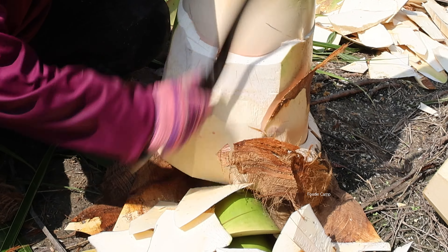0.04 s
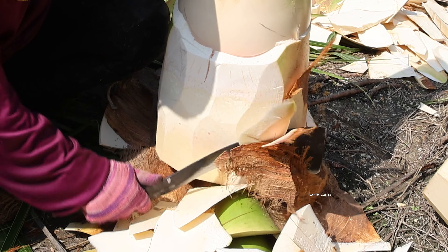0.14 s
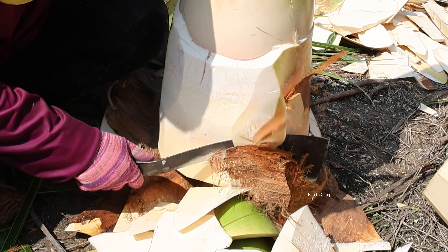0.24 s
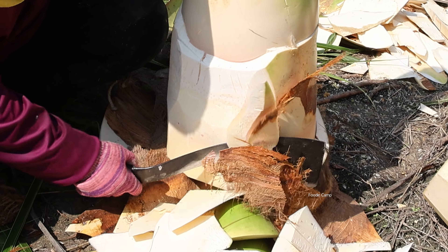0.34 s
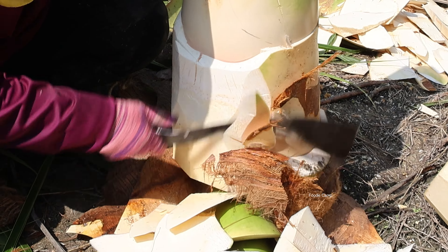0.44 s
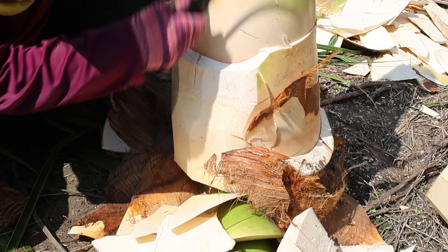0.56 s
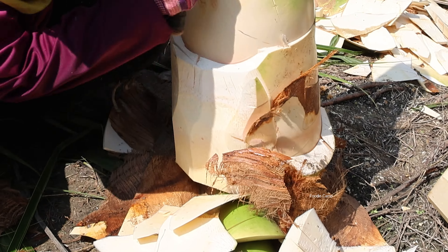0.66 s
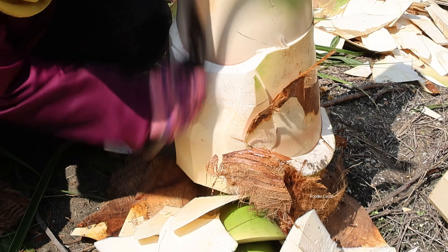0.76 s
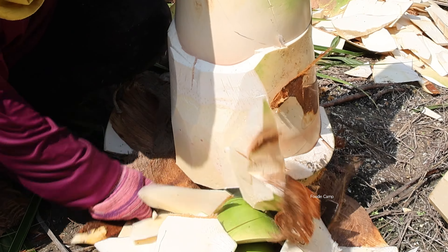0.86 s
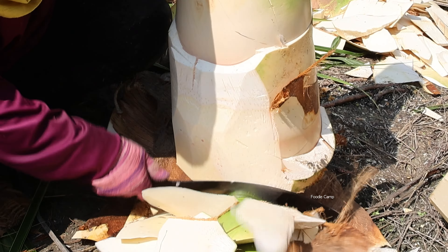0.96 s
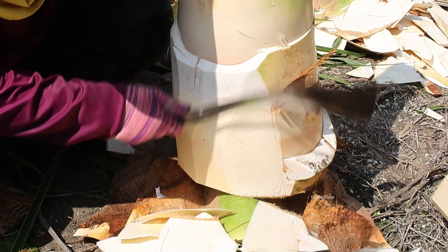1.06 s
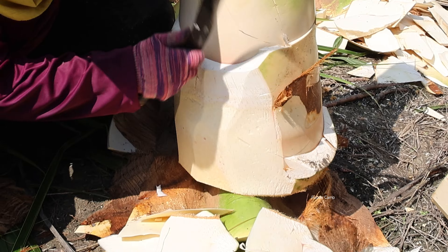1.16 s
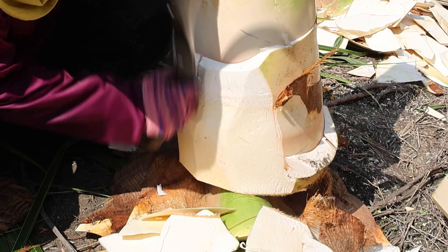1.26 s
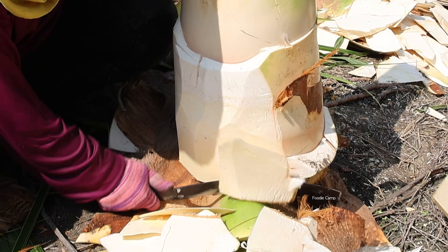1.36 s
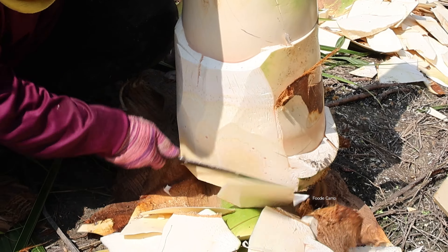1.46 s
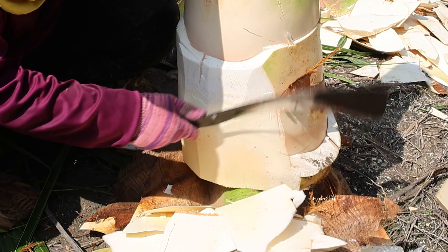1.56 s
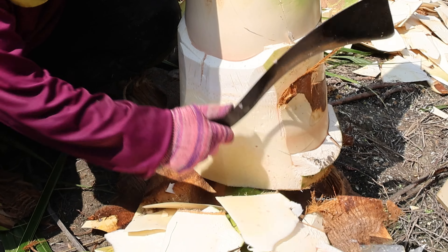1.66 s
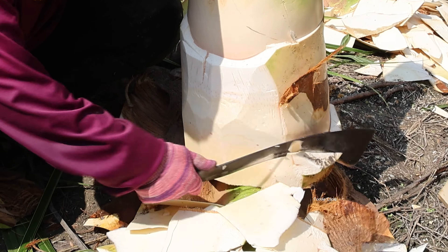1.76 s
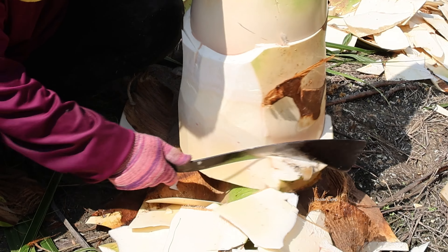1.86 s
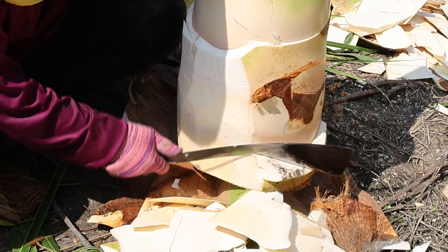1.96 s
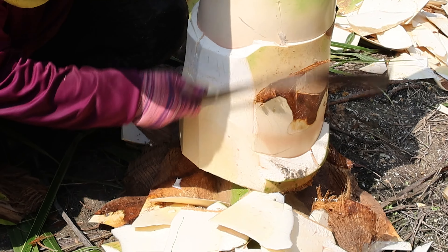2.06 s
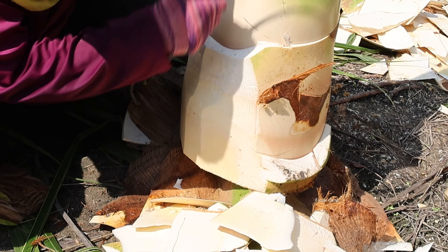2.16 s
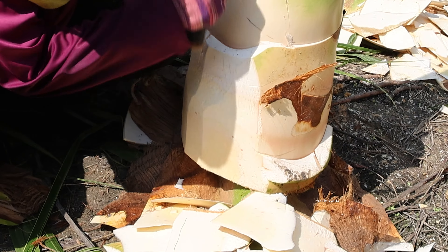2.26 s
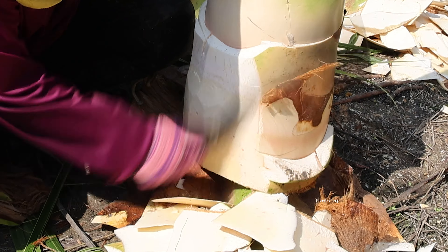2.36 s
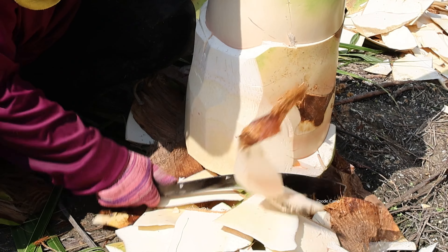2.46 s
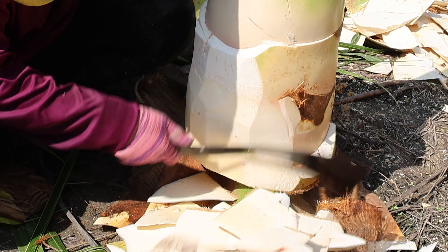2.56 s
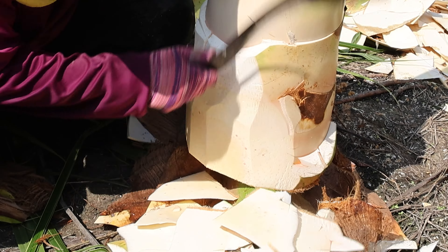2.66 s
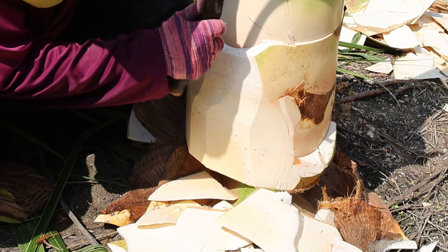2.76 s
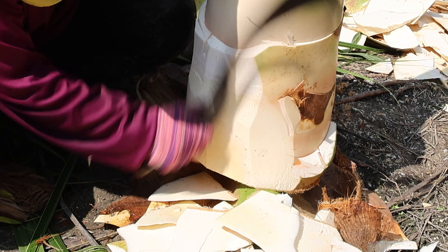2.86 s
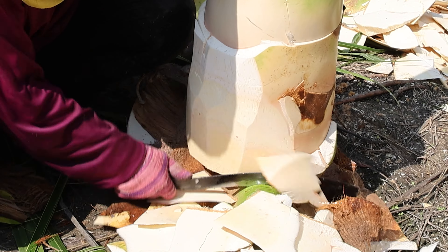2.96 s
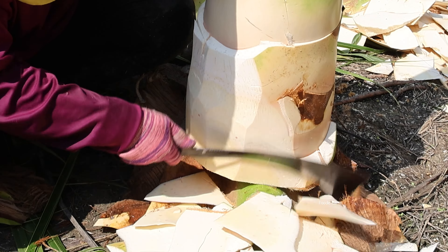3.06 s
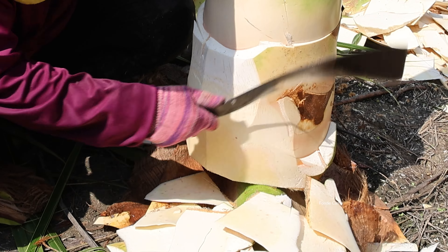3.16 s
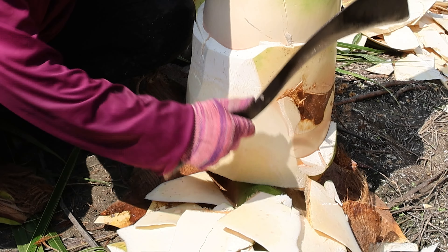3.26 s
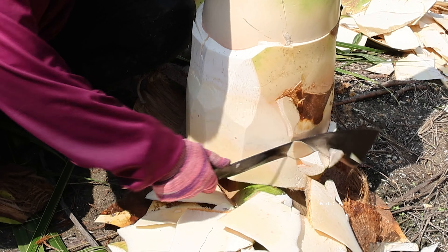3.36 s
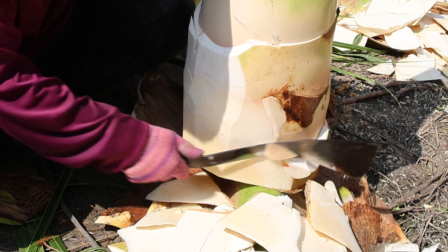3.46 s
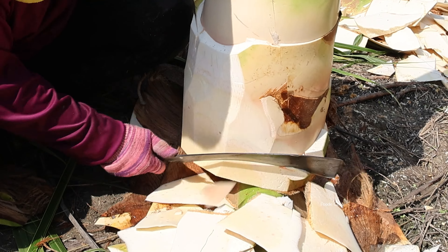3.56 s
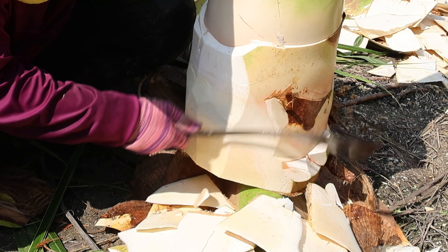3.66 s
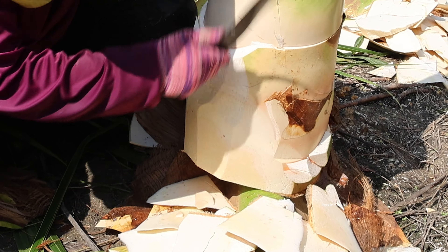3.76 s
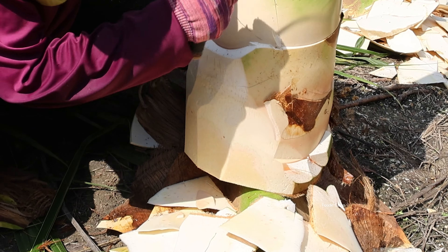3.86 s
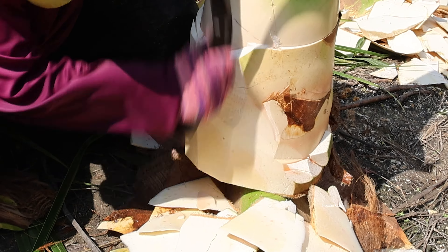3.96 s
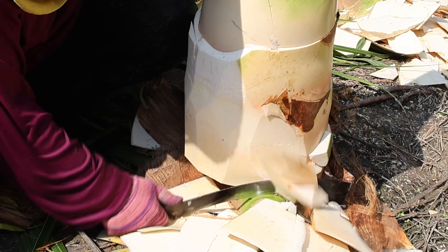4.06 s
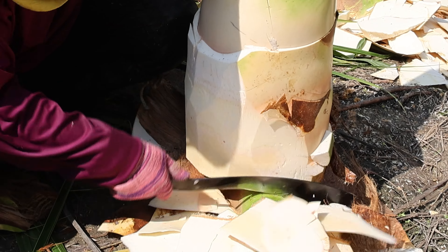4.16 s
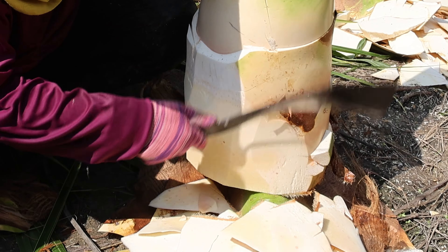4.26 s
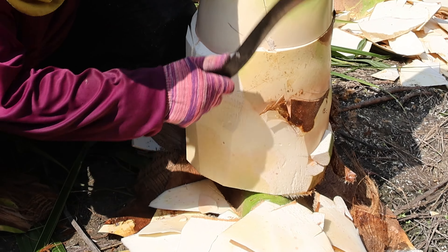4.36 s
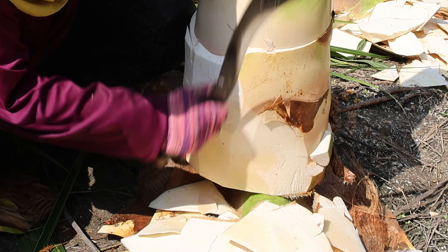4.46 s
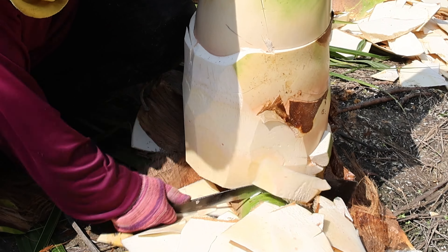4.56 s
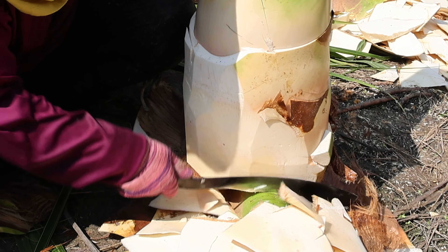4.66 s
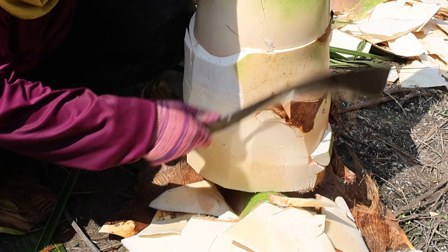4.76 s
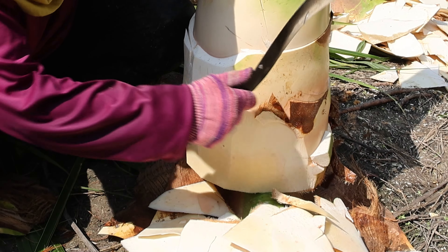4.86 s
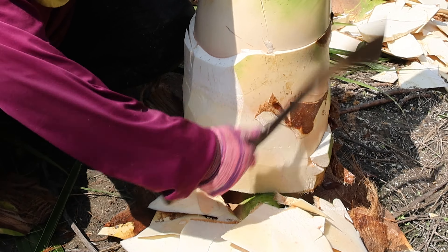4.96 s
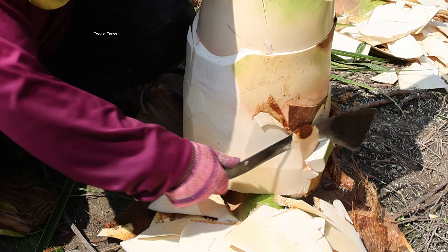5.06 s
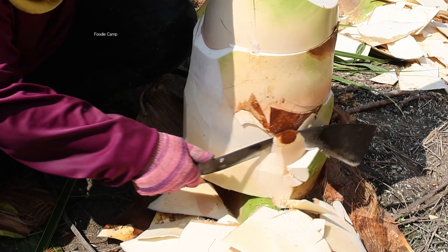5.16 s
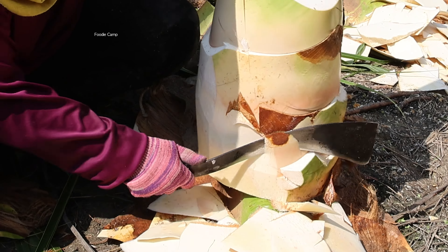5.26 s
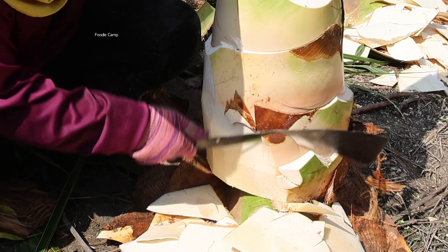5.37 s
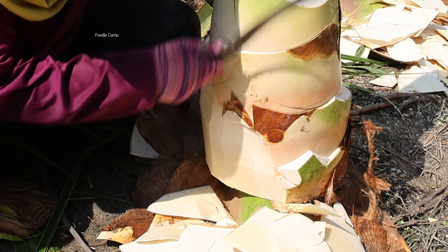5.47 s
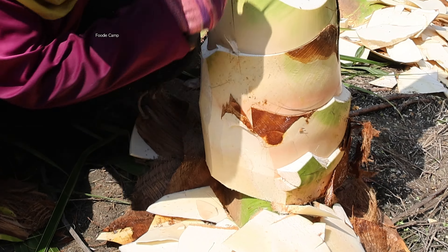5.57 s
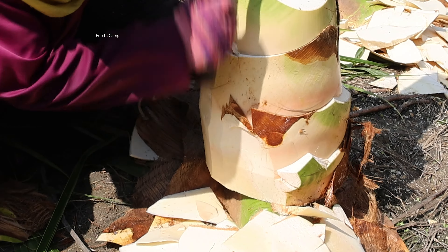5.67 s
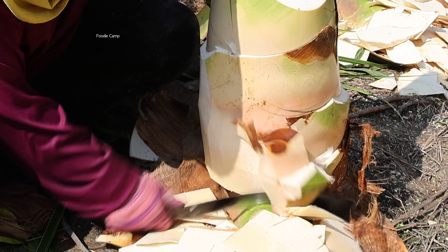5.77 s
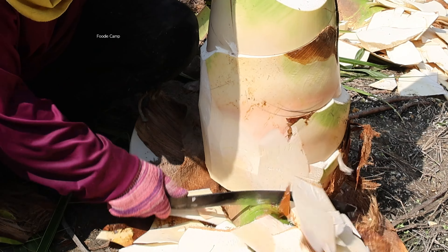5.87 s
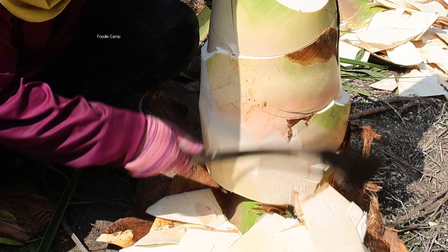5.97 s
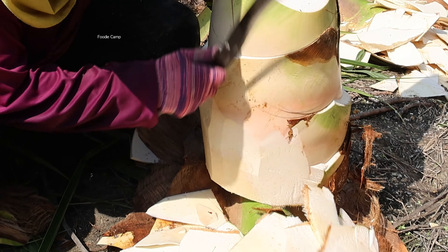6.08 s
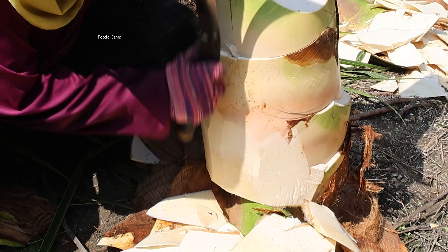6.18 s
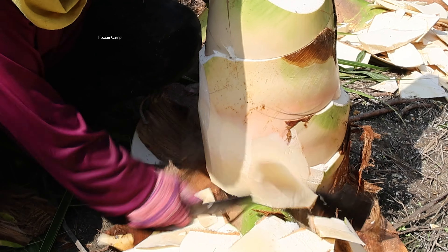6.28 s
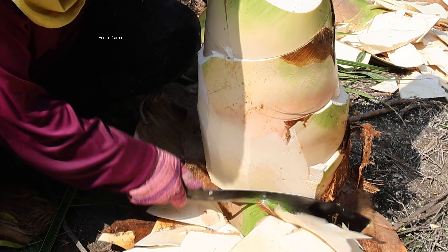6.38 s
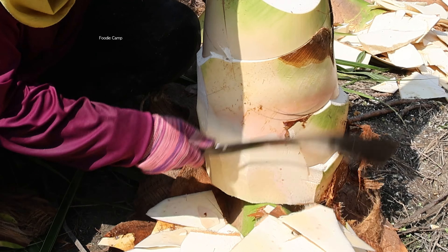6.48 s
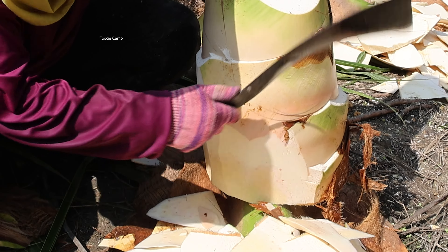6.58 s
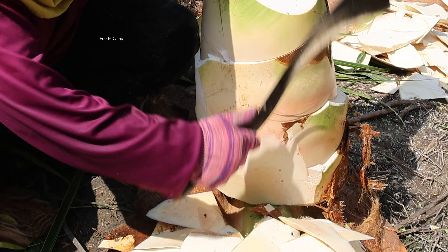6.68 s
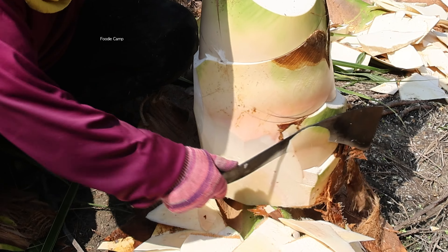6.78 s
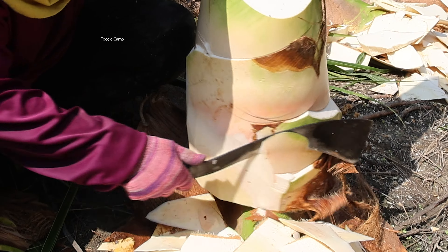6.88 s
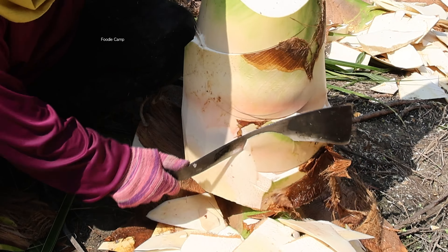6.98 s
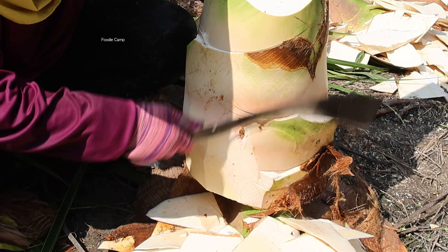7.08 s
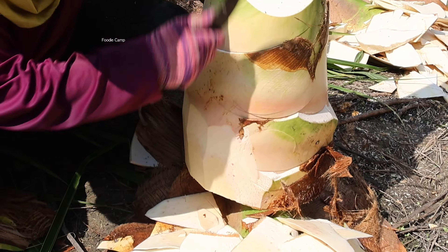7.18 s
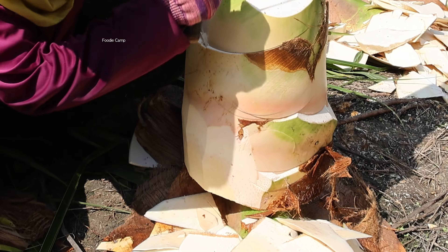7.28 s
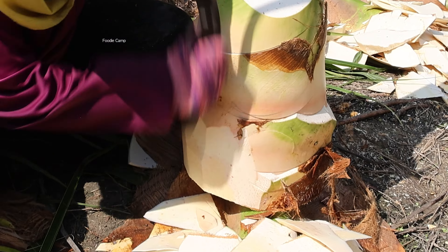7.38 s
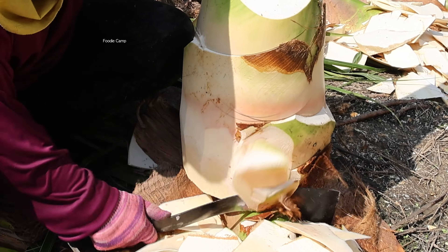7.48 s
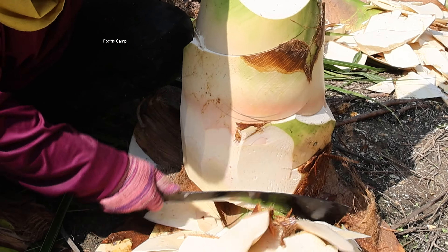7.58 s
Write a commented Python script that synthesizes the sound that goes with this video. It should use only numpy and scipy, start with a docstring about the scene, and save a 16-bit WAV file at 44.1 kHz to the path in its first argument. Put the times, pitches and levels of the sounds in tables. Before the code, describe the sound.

A machete bites into moist, fibrous stem, crunch and low woody thock together, some strokes bright and crisp, others duller. Between them come loose husk crackles, snapping fibres and small falling chips. A sharp cracking cluster with a metallic ting comes near the middle, and a hard crack ends the run. Close microphone outdoors, faint wind rumble, soft hiss and only a tiny short echo from the ground.

```python
"""A thin outdoor hiss and low wind on the microphone come first; then a blade slices a juicy palm stem up close.
Each cut is shaped noise, fibres tearing for 16 to 44 ms, and hollow knocks are decaying sines with a slap.
Snaps and chip ticks are short noise bursts, husk rustles as crackling noise, and a grazing blade rings in sines.
The ground and heaps nearby return a short, quiet echo; the recorder rounds off the loudest peaks."""
import sys
import numpy as np
from scipy import signal
from scipy.fft import rfft, irfft, next_fast_len
from scipy.io import wavfile
from scipy.ndimage import uniform_filter1d, map_coordinates

SR = 44100
rng = np.random.default_rng(int(sys.argv[2]) if len(sys.argv) > 2 else 0)


def makeup_ratio(level_db):
    """Linear amplitude ratio for a level in decibels (20 dB per factor of ten)."""
    decades = np.asarray(level_db, float) / 20
    return 10 ** decades


def transcribe(u):
    """Save the signal u as a 16-bit wav file named by the first command-line argument.

    u: samples, shape (n,) or (channels, n), limited to [-1, 1]; the rate is SR.
    q: integer samples, one column per channel.
    """
    v = np.clip(np.atleast_2d(u).T, -1, 1)
    q = np.round(v * 32767).astype(np.int16)
    wavfile.write(sys.argv[1], SR, q)


N = 336469  # length in samples

# Colour of the distant outdoor hiss: freq_hz, gain_db
AIR_COLOUR = [(32, -27), (55, -3.5), (270, -14), (767, -14), (1980, -23), (4040, -24.5), (9000, -34.5),
              (15600, -32), (16300, -57)]
# Wind at the microphone, mean level over time: time_s, level_db
WIND_LEVEL = [(0, -41), (.65, -38.5), (.95, -41), (1.3, -39), (2.2, -39), (3.8, -47), (5.2, -40.5),
              (5.8, -44.5), (6.7, -37), (7.3, -34.5), (7.63, -44)]
# Colour of the wind rumble: freq_hz, gain_db
WIND_COLOUR = [(15, -7.5), (33, -1.5), (42, -14.5), (60, -20), (90, -59)]
# Echo from ground and heaps nearby: freq_hz, t60_s
YARD_DECAY = [(300, 0.21), (2000, 0.079), (10000, 0.019)]
# Husk and chips stirred by blade and hand: start_s, swell_s, hold_s, level_db
STIR_EVENTS = [(0, 0.095, 0.05, -49.5), (0.543, 0.025, 0.313, -36), (0.983, 0.1, 0.011, -40.5),
               (1.487, 0.044, 0.044, -45.5), (1.965, 0.014, 0.0087, -38), (2.059, 0.023, 0.011, -45.5),
               (2.277, 0.07, 0.11, -36.5), (2.534, 0.05, 0.076, -42), (3.013, 0.016, 0.096, -40),
               (3.216, 0.21, .1, -47.5), (3.442, 0.017, 0.099, -36), (3.654, 0.064, 0.02, -38.5),
               (3.915, 0.15, .57, -51), (5.177, 0.042, 0.069, -47.5), (5.402, 0.056, 0.02, -38.5),
               (5.51, 0.067, 0.023, -50.5), (6.212, 0.042, 0.048, -41), (6.426, 0.04, 0.022, -40),
               (6.873, 0.13, 0.028, -45.5), (7.58, 0.02, .05, -39)]
# Colour of the dry husk crackle: freq_hz, gain_db
HUSK_COLOUR = [(700, -19), (1600, 0), (4200, 3), (11300, -0.5), (16000, -6.5)]
# Blade grazes: start_s, level_db, favoured_hz (of the spot touched), free_s (until damped)
GRAZE_EVENTS = [(0.524, -41, 2900, 0.03), (0.556, -36, 1650, .07), (0.603, -32, 2620, 0.15),
                (.796, -36, 8570, .04), (1.09, -37, 8570, 0.12), (1.58, -38, 10800, 0.07),
                (1.988, -33.5, 2900, 0.27), (2.094, -34.5, 9240, 0.092), (3.55, -17.5, 7650, 0.056),
                (4.28, -43, 2850, 0.11), (4.652, -31, 8280, 0.064), (6.256, -35, 2620, 0.066)]
# Ringing modes of the steel blade: mode_hz, level_db, t60_s
STEEL_MODES = [(1650, -24, 0.18), (2620, -40, 0.2), (2896, -23, 0.31), (4480, -18, 0.51), (5900, -14, 0.12),
               (7650, -26, 0.12), (8280, -33, 0.18), (8570, -34, 0.091), (9240, -13, 0.092),
               (10840, -5, 0.053), (12500, -19, 0.067), (14000, -15, .06), (14990, -18, .12)]
# Fibre snaps and chip ticks: start_s, level_db, centre_hz
SNAP_EVENTS = [(.206, -12, 5360), (.2133, -23, 4630), (0.236, -31, 2360), (.43, -33.5, 5800),
               (0.5534, -18, 5600), (0.5836, -17, 5900), (0.6085, -18, 4570), (0.628, -17.5, 5000),
               (0.8487, -19.5, 4200), (1.9778, -27, 3220), (1.9858, -24.5, 2900), (1.986, -24, 10400),
               (2.0941, -34, 9240), (2.3057, -27, 5050), (2.3221, -25, 4400), (2.3444, -24, 6300),
               (3.485, -12.5, 7800), (3.5103, -8.5, 7140), (3.5154, -6.5, 4570), (3.5227, -18, 4740),
               (3.5488, -14, 8200), (3.607, -15, 3450), (3.6244, -20.5, 4600), (3.707, -27.5, 7200),
               (3.735, -24, 9000), (4.2415, -31.5, 4440), (5.154, -19, 6800), (5.158, -14.5, 4130),
               (5.1818, -21, 10600), (5.3557, -30, 2110), (6.1236, -31, 3950), (6.2488, -16.5, 6500),
               (6.2764, -21, 6500), (7.5365, -1, 3550), (7.557, -1.5, 3390), (7.6254, -25, 9800)]
# Blade juddering as it is prised through husk, a snap a slip: first_s, last_s, period_s, level_db, centre_hz
JUDDER_RUNS = [(0.6613, .835, .0166, -29, 3130), (2.37, 2.466, 0.012, -25.5, 2270)]
# Hollow knocks of the stem and of falling chips: start_s, level_db, pitch_hz
KNOCK_EVENTS = [(0.168, -10.5, 358), (0.924, -1.5, 498), (1.066, -15.5, 512), (1.097, -16, 333),
                (1.441, -1.5, 488), (1.846, -11, 336), (2.502, -6.5, 495), (3.013, -4.5, 533),
                (3.117, -26, 517), (3.446, -14, 268), (4.08, -27, 546), (4.147, -9.5, 490),
                (4.22, -28, 645), (4.648, -3, 484), (4.773, -13, 517), (4.907, -28.5, 910),
                (5.083, -14.5, 601), (5.255, -22, 1080), (5.2873, -6, 514), (5.843, -9.5, 867),
                (5.869, -5, 494), (6.033, -24.5, 900), (6.347, -21, 850), (6.389, 0, 506),
                (6.449, -24, 630), (6.506, -16, 890), (6.853, -13, 268), (7.03, -26, 800), (7.05, -29, 970),
                (7.569, -15, 675)]
# Modes of the wet stem: multiple (of the knock pitch), level_db, t60_s (for a 500 Hz knock)
STEM_MODES = [(1, -1.5, 0.047), (1.45, -3, 0.026), (2.2, 4, 0.0083), (.55, -24.5, 0.1)]
# Cuts: start_s, length_s, tearing_db, rise_s (until the edge bites fully), treble_db (over body at mid-cut)
CUT_EVENTS = [(0.1644, 0.033, -6, 0.011, 4.5), (0.893, 0.037, -7, 0.01, -4), (1.407, 0.043, -8, 0.013, 0),
              (1.842, 0.017, -7, 0.016, 5), (2.4652, 0.044, -10, 0.0008, -0.5),
              (2.985, 0.038, -8, 0.017, 1), (3.445, 0.016, -6, 0.009, 3.5),
              (4.1126, 0.04, -7.5, 0.0093, -0.5), (4.6356, 0.02, -7, 0.0024, 1.5),
              (5.0821, 0.028, -11.5, 0.0095, 7.5), (5.839, 0.035, -8.5, .0015, -4),
              (6.361, 0.036, -8.5, 0.0061, 4.5), (6.831, 0.018, -13.5, 0.0025, 2),
              (7.5359, 0.041, -13.5, 0.0038, -6.5)]
# Colour of tearing fibres: freq_hz, gain_db
TEAR_COLOUR = [(88, -78), (150, -18), (566, -7.5), (1700, -7), (4000, -4), (5910, -3.5), (14000, -8),
               (16000, -16)]


def unit(x):
    """Scales a signal to rms 1."""
    return x / np.sqrt(np.mean(x ** 2) + 1e-20)


def decay(t, t60):
    """Exponential decay, falling 60 dB in t60 seconds."""
    return makeup_ratio(-60 * t / t60)


def along(points, hz):
    """Reads (freq_hz, value) points on a log frequency axis."""
    f, v = np.transpose(points)
    return np.interp(np.log(hz + 1), np.log(f + 1), v)


def wobble(rate, size=N):
    """A smooth random curve with rate knots a second."""
    knots = rng.standard_normal(size // 20 + 4)
    return map_coordinates(knots, [np.arange(size) * np.minimum(rate / SR, 1 / 20)])


def coloured(x, gain):
    """Passes x through a gain that depends on frequency, then scales it to rms 1."""
    padded = next_fast_len(len(x) + 2048)
    spectrum = rfft(x, padded) * gain(np.fft.rfftfreq(padded, 1 / SR))
    return unit(irfft(spectrum, padded)[:len(x)])


def add(track, s, sound):
    """Mixes a sound into the track at s seconds."""
    part = track[round(s * SR):][:len(sound)]
    part += sound[:len(part)]


def outdoors():
    """Far hiss that drifts slowly in level, and wind that rumbles on the microphone."""
    hiss = coloured(rng.standard_normal(N), lambda hz: makeup_ratio(along(AIR_COLOUR, hz)))
    rumble = coloured(rng.standard_normal(N), lambda hz: makeup_ratio(along(WIND_COLOUR, hz)))
    wind_db = np.interp(np.arange(N) / SR, *np.transpose(WIND_LEVEL)) + 5.7 * wobble(4.5)
    return makeup_ratio(-46 + 0.94 * wobble(3.32)) * hiss + makeup_ratio(wind_db) * rumble


def yard(x):
    """Ground and heaps nearby answer briefly, treble dying first; the tail differs every 0.3 s."""
    out, step = np.zeros(N), SR * 3 // 10
    for i in range(0, N, step):
        hz, t, z = signal.stft(rng.standard_normal(SR // 4), SR, nperseg=256)
        fading = z * decay(t, along(YARD_DECAY, hz)[:, None])
        tail = signal.istft(fading, SR, nperseg=256)[1]
        add(out, i / SR, signal.fftconvolve(x[i:i + step], tail / np.linalg.norm(tail)))
    return out


def stirring_db():
    """Level of loose husk moving: the heap at rest, the stirs, and the crumbs every cut throws off."""
    still_db, swell_db, settle_t60 = -57.5, -11, 0.35  # a stir starts swell_db down
    debris_db, debris_t60 = -32, 0.47  # crumbs, relative to their cut's tearing_db
    t = np.arange(N) / SR
    power = np.full(N, makeup_ratio(2 * still_db))
    for s, swell, hold, db in STIR_EVENTS:
        rise_db = swell_db * np.clip(1 - (t - s) / swell, 0, 1)
        settle_db = -60 * np.maximum(t - s - swell - hold, 0) / settle_t60
        power += (t > s) * makeup_ratio(2 * (db + rise_db + settle_db))
    for s, length, db, *_ in CUT_EVENTS:
        settle_db = -60 * np.maximum(t - s - length, 0) / debris_t60
        power += (t > s) * makeup_ratio(2 * (db + debris_db + settle_db))
    return 10 * np.log10(power)


def rustle(level_db):
    """Dry husk crackles in uneven bursts and patches of colour; heavier chips shuffle dully beneath."""
    uneven = makeup_ratio(1.1 * wobble(70) + 0.3 * wobble(500)) * rng.standard_normal(N)
    z = signal.stft(uneven, nperseg=256)[2]
    patches = uniform_filter1d(rng.standard_normal(z.shape), size=9, axis=0)  # across frequency
    patches = uniform_filter1d(patches, size=4, axis=1)  # across time
    patchy_db = 3 * unit(patches)
    crackle = signal.istft(z * makeup_ratio(patchy_db), nperseg=256)[1][:N]
    crackle = coloured(crackle, lambda hz: makeup_ratio(along(HUSK_COLOUR, hz)))
    shuffle = makeup_ratio(5.8 * wobble(40)) * rng.standard_normal(N)
    shuffle = coloured(shuffle, lambda hz: hz / (hz + 300) / (1 + (hz / 1500) ** 2))
    return makeup_ratio(level_db) * (crackle + makeup_ratio(-2.5) * shuffle)


def blade():
    """A graze rings all modes of the steel, fully those near the favoured pitch; a light touch wakes others less."""
    out, t = np.zeros(N), np.arange(SR // 4) / SR
    for s, db, favoured_hz, free in GRAZE_EVENTS:
        ring = np.zeros(len(t))
        for hz, level, t60 in STEEL_MODES:
            general = makeup_ratio(level + 0.079 * (db + 24) + rng.normal(0, 1.9))
            favoured = np.exp(-(np.log(hz / favoured_hz) / 0.027) ** 2)
            ring += (general + favoured) * decay(t, t60) * np.sin(2 * np.pi * hz * t)
        damping = decay(np.maximum(t - free, 0), 0.015)
        add(out, s, makeup_ratio(db) * damping * ring)
    return out


def judder_slips():
    """A juddering blade sticks and slips almost regularly, each slip a snap of uneven level and colour."""
    slips = []
    for first, last, period, db, hz in JUDDER_RUNS:
        for s in np.arange(first, last, period):
            centre_hz = hz * np.exp(rng.normal(0, 0.17))
            slips.append((s + rng.normal(0, 0.0007), db + 2 * rng.normal(), centre_hz))
    return slips


def random_ticks(loose_db):
    """Small snaps of any colour come at random, as loud as the rustle around them allows."""
    when, size, pitch = rng.random((800, 3)).T
    at = (when * (N - 1)).astype(int)
    level_db = loose_db[at] + 1 - 3 * np.log(size + 0.035)  # many small, few large
    return np.transpose([at / SR, level_db, 1200 * 8 ** pitch])


def snaps(loose_db):
    """Sharp noise bursts, broadly peaked around their centre, each a crack with a little debris after it."""
    peak_width = 0.33  # in log frequency
    out, t = np.zeros(N), np.arange(SR // 16) / SR
    crack, debris = decay(t, 0.013), makeup_ratio(-11) * decay(t, 0.062)
    shape = (crack + debris) * (1 - np.exp(-t / 0.00034))

    def colour(hz, centre_hz):
        broad = hz / (hz + centre_hz / 2) / (1 + (hz / (3 * centre_hz)) ** 2)
        return broad + np.exp(-(np.log((hz + 1) / centre_hz) / peak_width) ** 2)

    for s, db, centre_hz in [*SNAP_EVENTS, *judder_slips(), *random_ticks(loose_db)]:
        burst = coloured(rng.standard_normal(len(t)), lambda hz: colour(hz, centre_hz))
        add(out, s, makeup_ratio(db) * shape * burst)
    return out


def knocks():
    """A dull slap of contact, and the dense wet stem rings at a few low modes; small high chips die sooner."""
    out, t = np.zeros(N), np.arange(SR // 8) / SR
    onset = 1 - np.exp(-t / 0.0013)
    for s, db, hz in KNOCK_EVENTS:
        hurry = max(hz / 500, 0.85) ** 0.92  # decay speeds up with pitch
        ring = np.zeros(len(t))
        for multiple, level, t60 in STEM_MODES:
            mode = np.sin(2 * np.pi * hz * multiple * t)
            ring += makeup_ratio(level + rng.standard_normal()) * decay(t * hurry, t60) * mode
        slap = coloured(rng.standard_normal(len(t)), lambda f: (f > 150) / (1 + (f / 1600) ** 2))
        slap = makeup_ratio(-6) * decay(t, 0.034) * slap
        add(out, s, makeup_ratio(db) * onset * (ring + slap))
    return out


def slot_resonance(t, length):
    """Noise resonates in the opening slot, lower once the blade is 0.64 of the way through."""
    def peak(centre_hz):
        return coloured(rng.standard_normal(len(t)),
                        lambda hz: 1 / (1 + (np.log((hz + 1) / centre_hz) / 0.088) ** 2))

    deep = 1 / (1 + np.exp((0.64 - t / length) * 10))
    return np.sqrt(1 - deep) * peak(3990) + np.sqrt(deep) * peak(2700)


def cuts():
    """Fibres tear as the edge travels; treble and slot pitch sink, and the level drops as the slice breaks free."""
    entry_db, sag_db, exit_db = -17, -2.5, -8.5  # first touch, slowing blade, last fibres: under the full bite
    exit_share, free_s, stop_t60 = 0.34, 0.0026, 0.0047  # part of the cut coming out, drop time, final decay
    split_hz, dull_db_per_s = 5500, 150  # body below, fizz above; how fast the fizz dulls
    out, t = np.zeros(N), np.arange(SR // 8) / SR
    bite = 1 - np.exp(-t / 0.0005)
    for s, length, db, rise, treble_db in CUT_EVENTS:
        body = coloured(rng.standard_normal(len(t)),
                        lambda hz: makeup_ratio(along(TEAR_COLOUR, hz)) / np.sqrt(1 + (hz / split_hz) ** 4))
        fizz = coloured(rng.standard_normal(len(t)),
                        lambda hz: makeup_ratio(along(TEAR_COLOUR, hz)) / np.sqrt(1 + (split_hz / (hz + 1)) ** 4))
        fizz_db = treble_db + dull_db_per_s * (length / 2 - np.minimum(t, length))
        tearing = body + makeup_ratio(-4) * slot_resonance(t, length) + makeup_ratio(fizz_db) * fizz
        tearing /= np.sqrt(1 + makeup_ratio(2 * treble_db))  # brighter cuts are not louder
        hold = max(rise, length * (1 - exit_share)) + 1e-6
        travel_db = np.interp(t, [0, rise, hold, hold + free_s], [entry_db, 0, sag_db, exit_db])
        stop = decay(np.maximum(t - length, 0), stop_t60)
        bursts_db = 1.5 * wobble(485, size=len(t))  # bundles of fibres give way unevenly
        add(out, s, makeup_ratio(db + travel_db + bursts_db) * stop * bite * tearing)
    return out


def scene():
    """Close sounds, with the deep bass cut away, and their short echo, over husk and background."""
    loose_db = stirring_db()
    no_bass = signal.butter(2, 170, "high", fs=SR, output="sos")
    near = signal.sosfilt(no_bass, blade() + snaps(loose_db) + knocks() + cuts())
    mix = outdoors() + makeup_ratio(-22.5) * yard(near) + rustle(loose_db) + near
    return mix[None]  # one channel


def low_pass(x):
    """Removes everything above the highest recorded frequency."""
    return signal.sosfilt(signal.butter(12, 15950, fs=SR, output="sos"), x)


def record(dry):
    """The recorder clips the loudest peaks with a slightly rounded knee."""
    top = 1.03  # clipping ceiling, relative to full scale
    mix = dry / (1 + np.abs(dry / top) ** 10) ** (1 / 10)
    return low_pass(mix)


dry = scene()
out = record(dry)
transcribe(out)
```